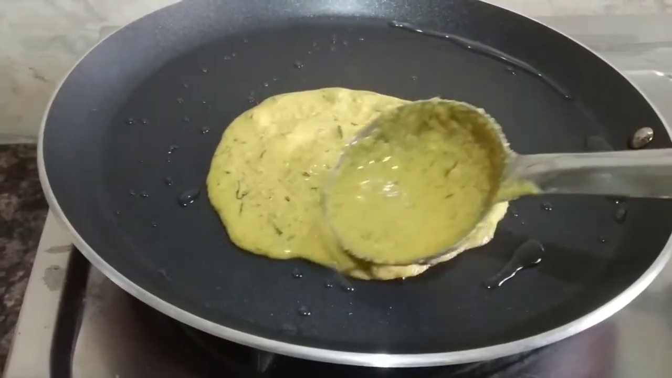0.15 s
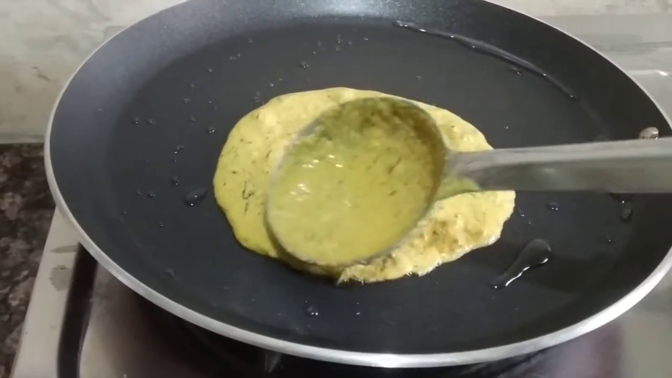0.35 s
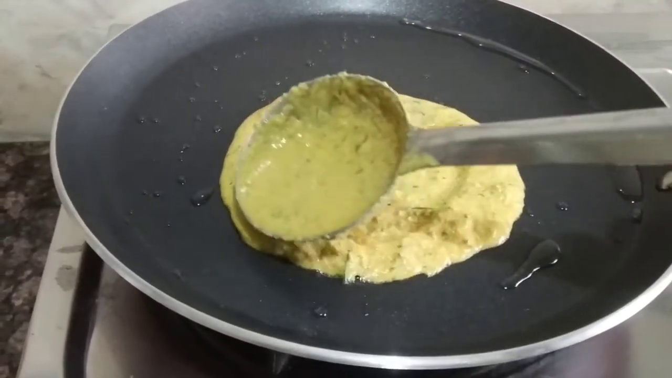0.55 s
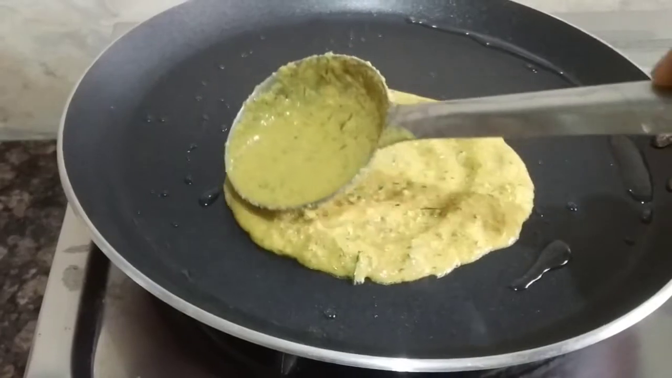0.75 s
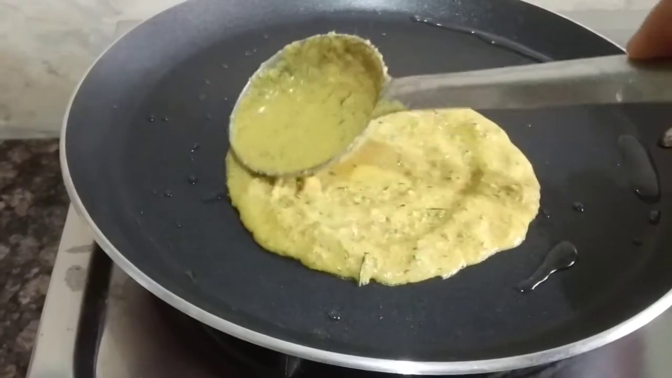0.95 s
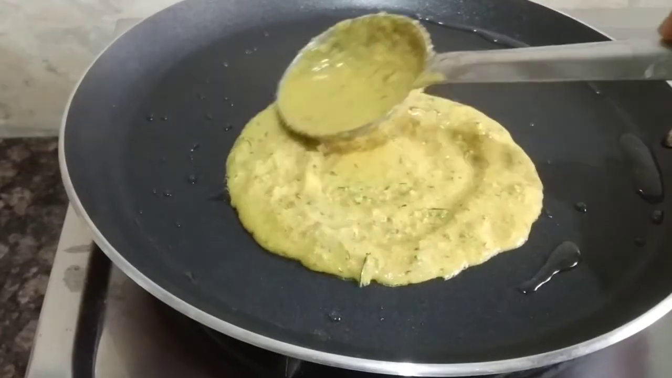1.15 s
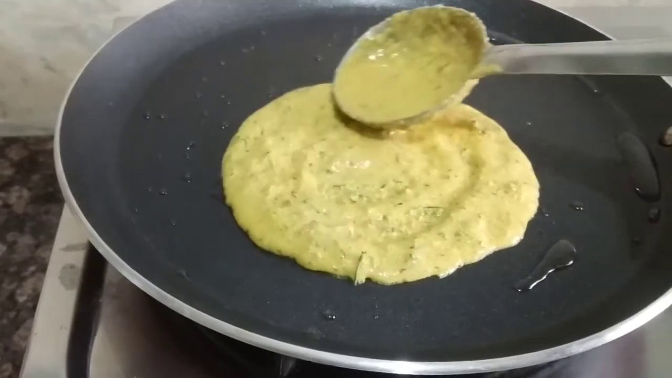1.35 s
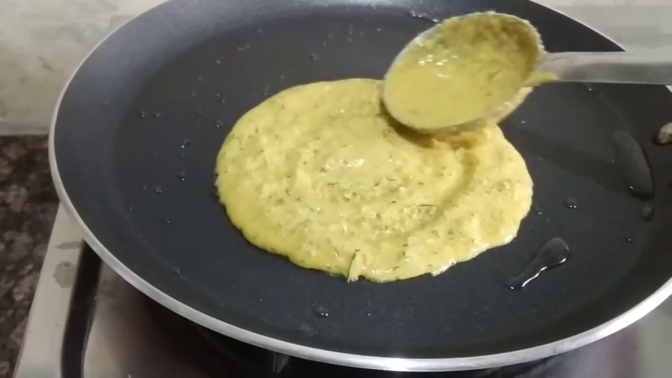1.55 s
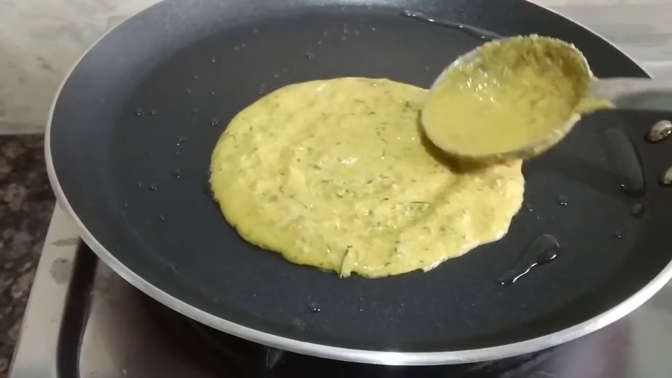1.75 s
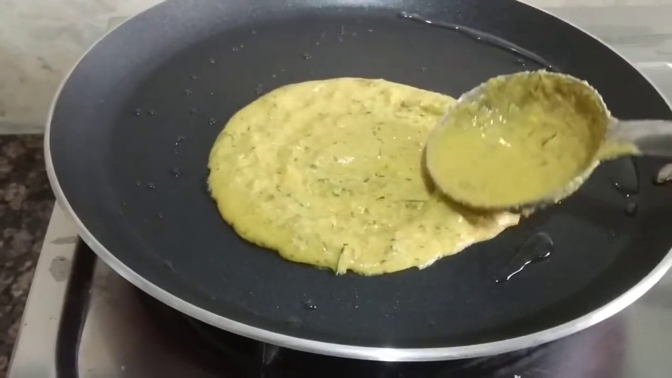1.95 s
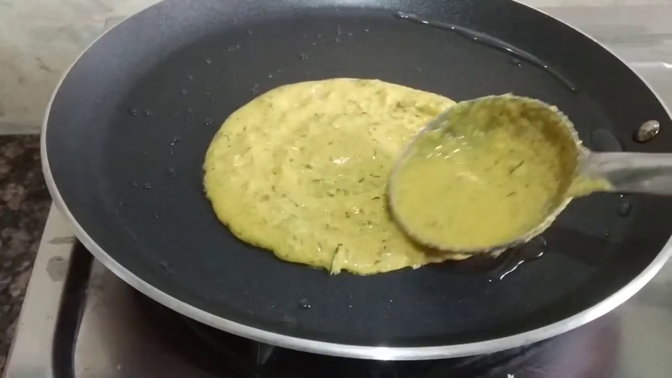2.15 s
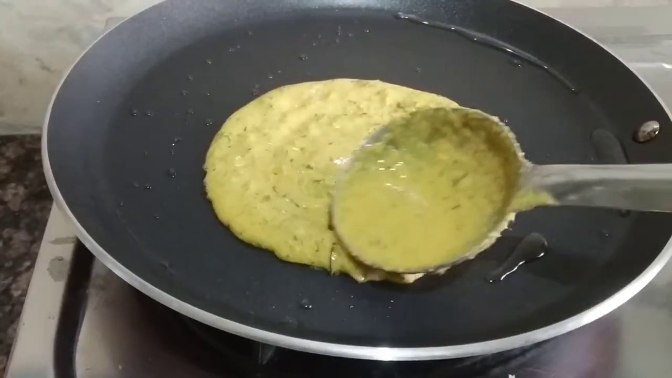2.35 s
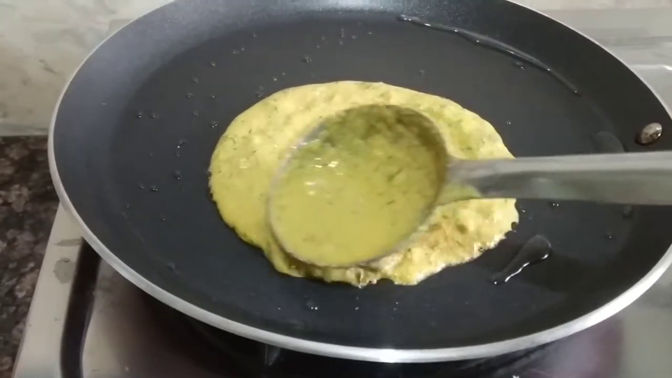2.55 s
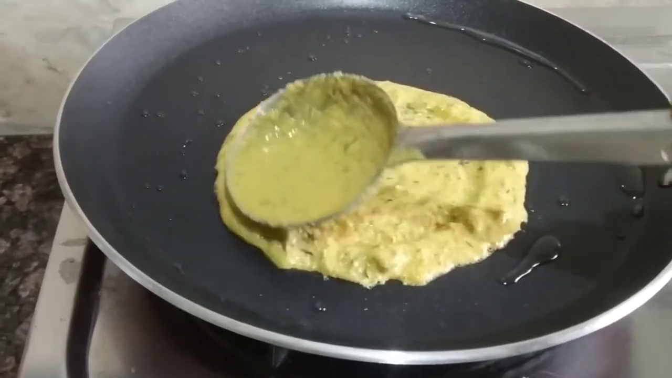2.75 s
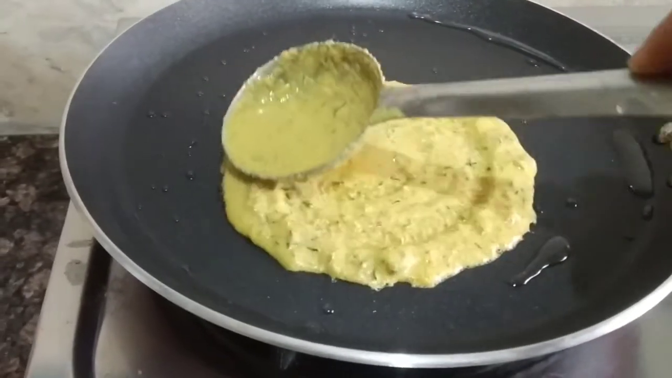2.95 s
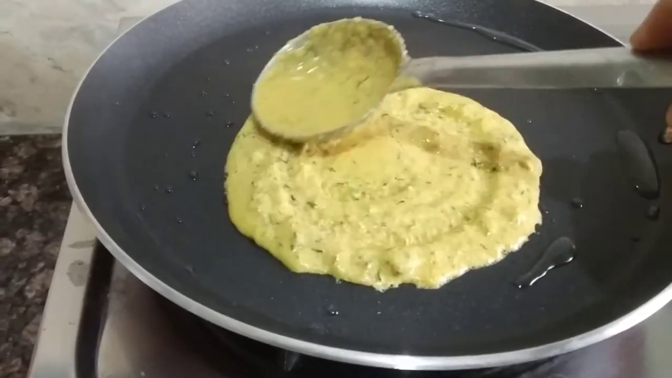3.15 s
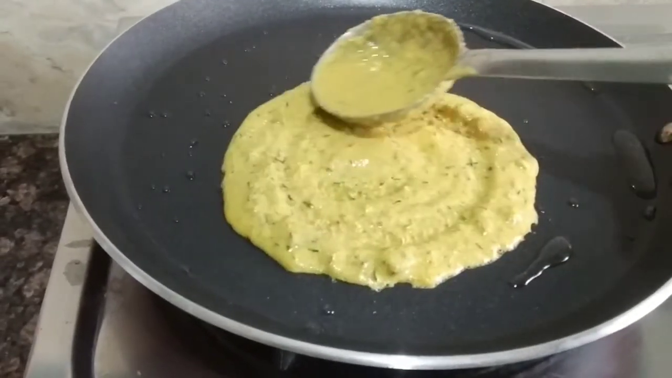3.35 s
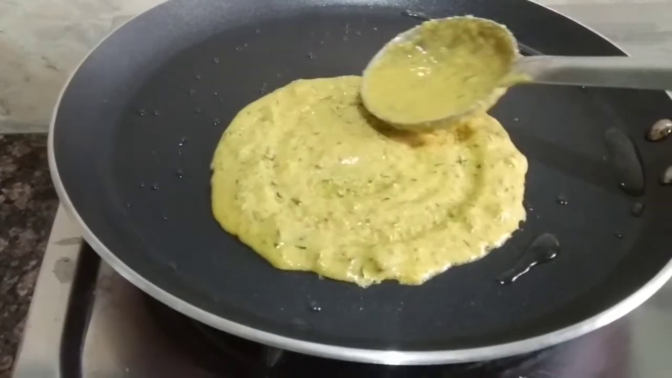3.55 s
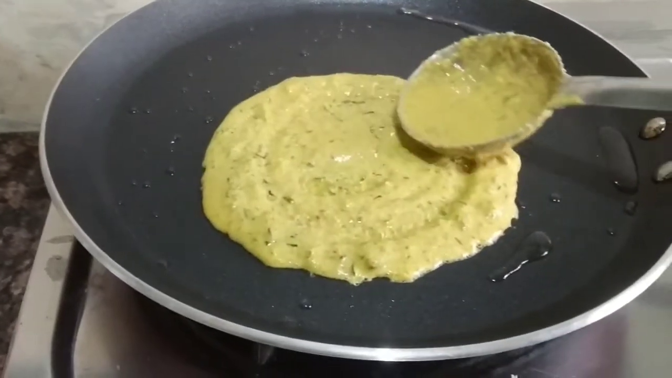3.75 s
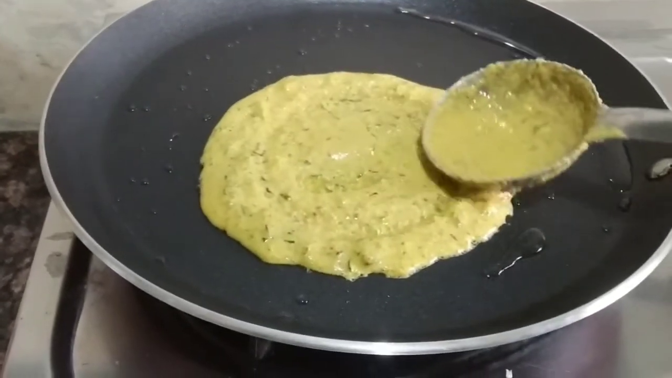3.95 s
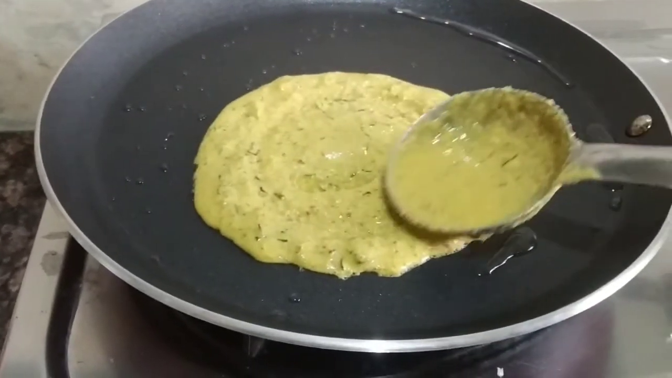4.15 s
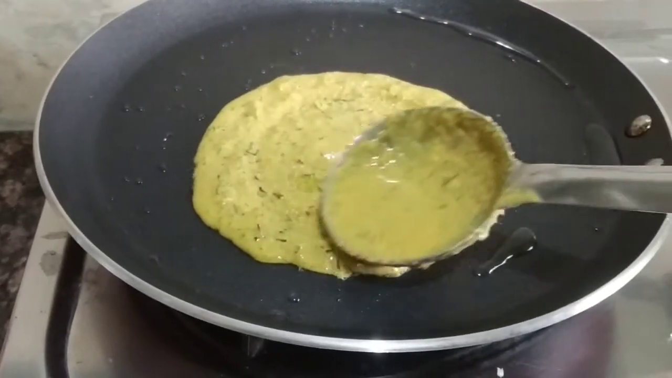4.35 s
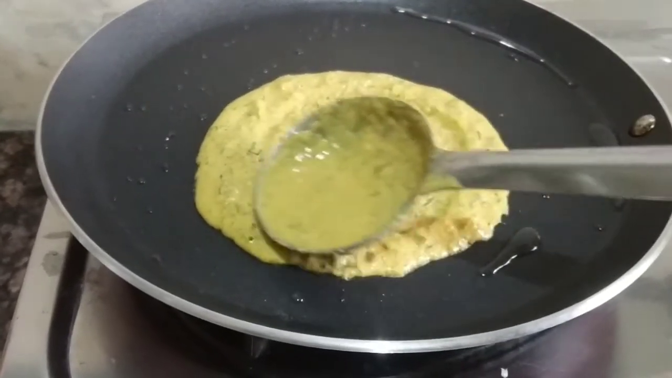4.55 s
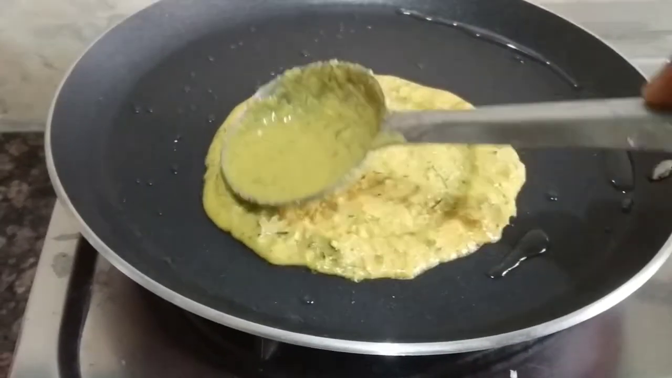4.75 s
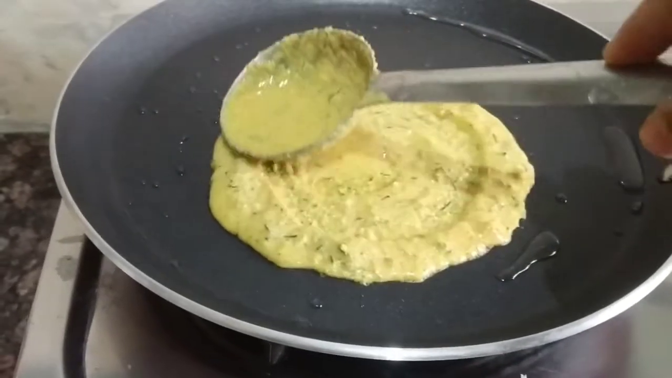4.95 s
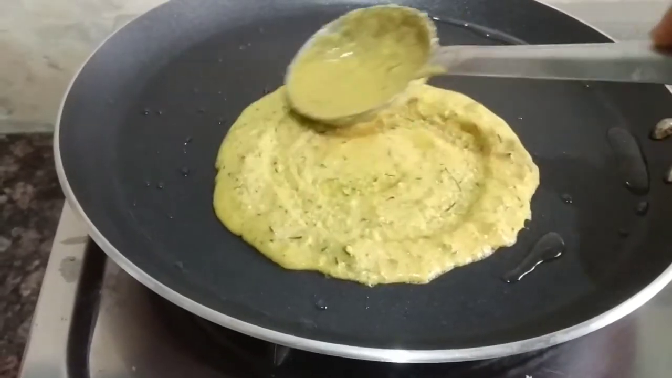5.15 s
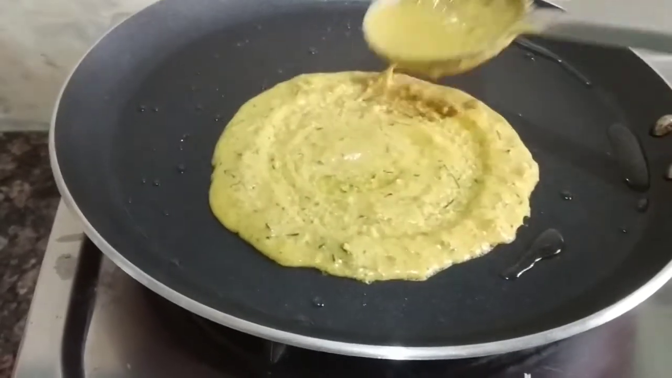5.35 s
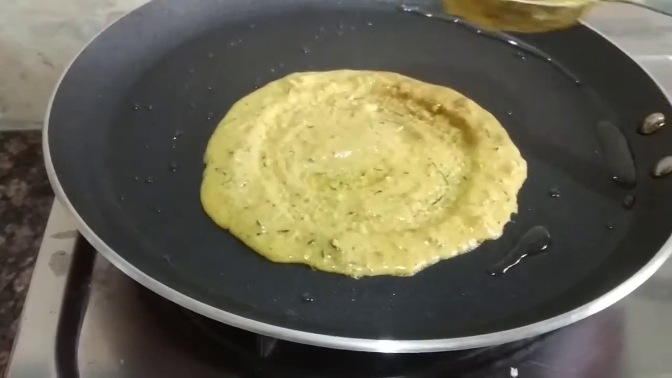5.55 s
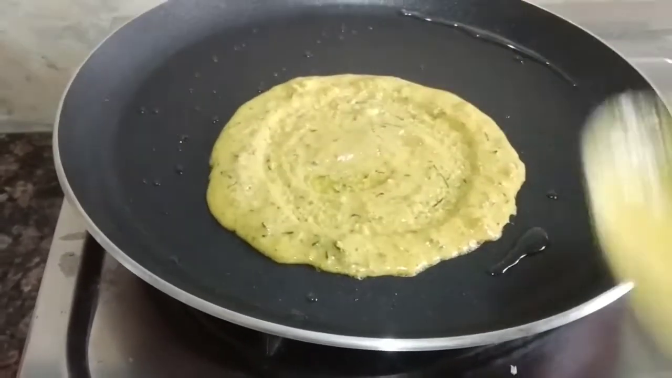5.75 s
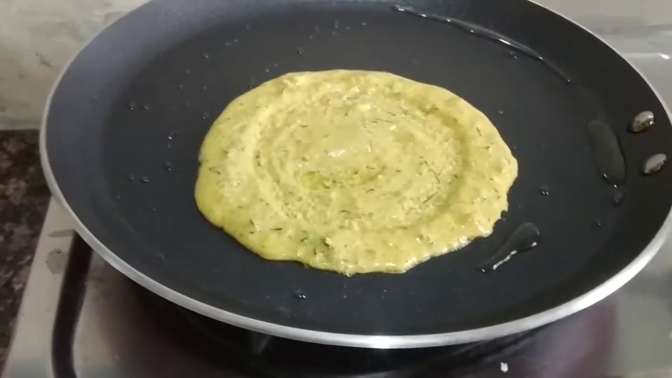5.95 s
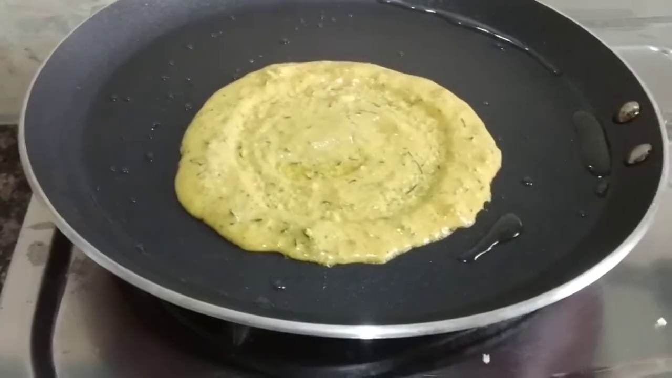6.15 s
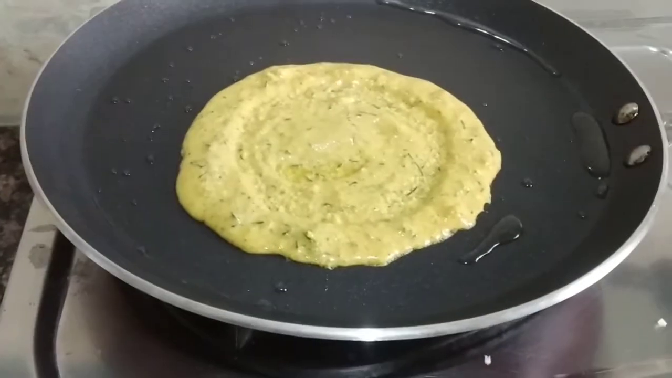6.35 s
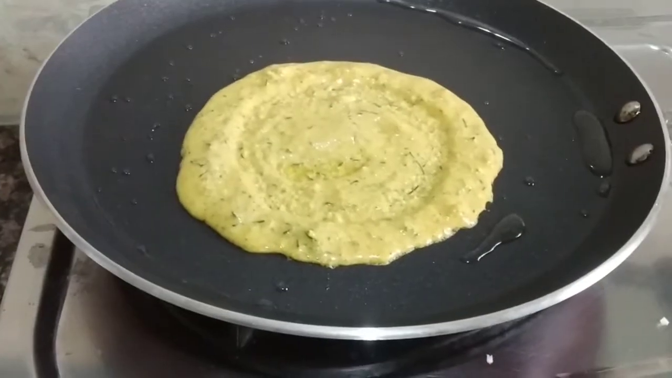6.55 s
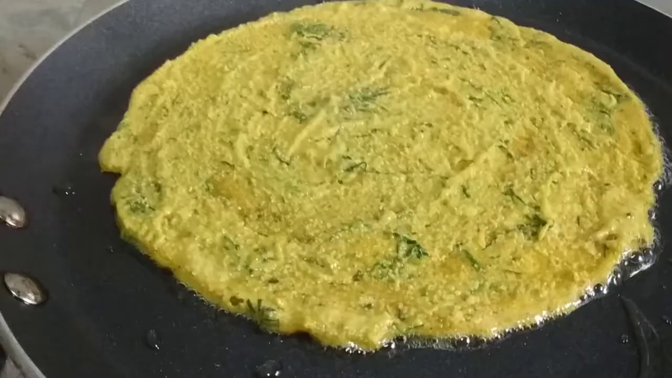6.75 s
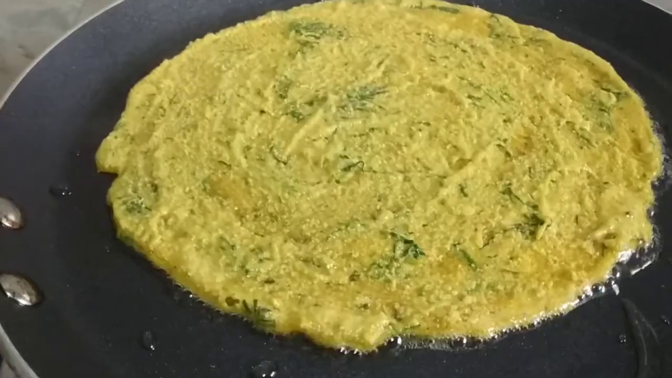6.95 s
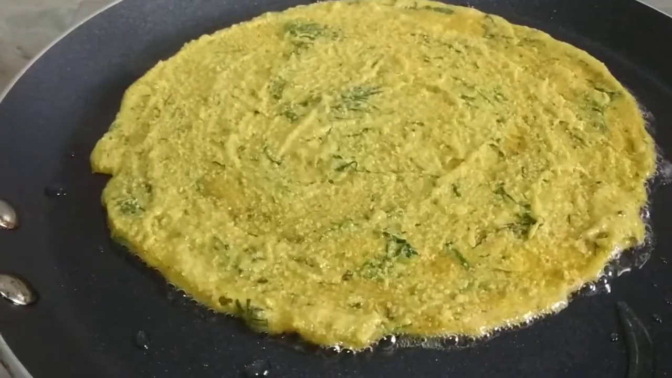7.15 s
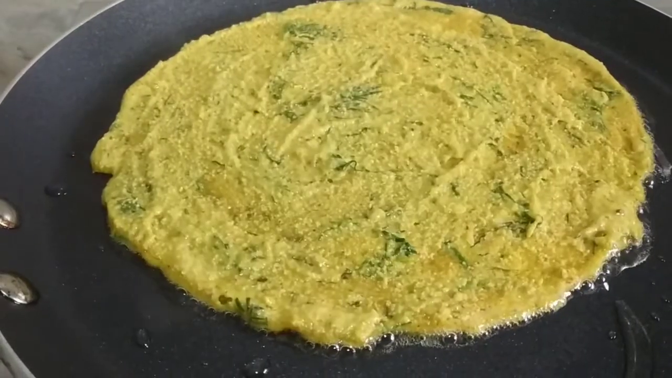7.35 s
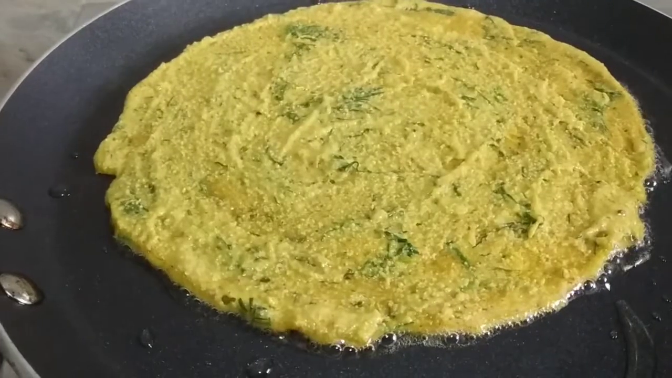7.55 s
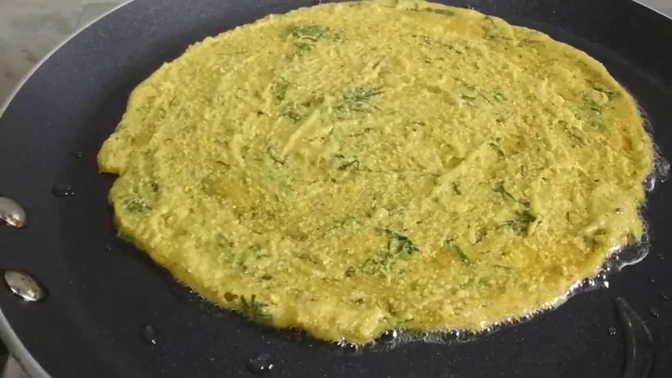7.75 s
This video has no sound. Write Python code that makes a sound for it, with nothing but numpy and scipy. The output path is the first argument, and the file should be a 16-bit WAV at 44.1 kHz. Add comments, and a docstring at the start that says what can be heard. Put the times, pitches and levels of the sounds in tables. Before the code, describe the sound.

Crisp close pan sizzle peppered with snapping oil pops, over low traffic rumble and a departing engine, then a short hard metal clank near six seconds.

```python
"""A small hard-walled kitchen: batter fries in oil on a pan, a dense fizz of bursting steam bubbles with louder pops.
Each bubble is a click that sets a short tone ringing; a pop is a sharper burst within a short swell of noise.
The steel ladle bumps the pan (soft noise round one pitch) and clanks on a metal bowl (contact noise rings steel).
Outside an engine, a stack of sines, speeds up and draws away over a low traffic rumble and hiss of shaped noise.
Two spaced microphones hear it, the pan a little to the right; dying noise makes the echoes."""
import sys
import numpy as np
from scipy import signal
from scipy.fft import rfft, irfft, next_fast_len
from scipy.io import wavfile

SR = 44100
rng = np.random.default_rng(int(sys.argv[2]) if len(sys.argv) > 2 else 0)


def inscribe(sig):
    """Save sig as 16-bit PCM at rate SR to the path in sys.argv[1].

    A 1-D sig is mono; a 2-D sig holds one channel per row.
    Samples are clipped to [-1, 1] before scaling.
    """
    pcm = np.round(np.clip(np.atleast_2d(sig).T, -1, 1) * 32767)
    wavfile.write(sys.argv[1], SR, pcm.astype(np.int16))


def magnitude_from_level(level_db):
    """Linear magnitude for a level in decibels (20 dB per decade)."""
    exponent = np.asarray(level_db, float) / 20
    return 10 ** exponent


N = 344421   # length in samples

# vigour of the frying, rising as the ladle pushes batter onto fresh oil: [t/s, relative level/dB]
FRYING_VIGOUR = [(0, -35.5), (.12, -38.5), (.66, -40.5), (.74, -38), (.9, -43), (1.22, -43.5), (1.5, -42),
                 (1.7, -43.5), (2.01, -39), (2.41, -40), (2.79, -44), (3.48, -46.5), (3.76, -40),
                 (4.0, -44.5), (4.27, -42), (4.36, -47.5), (5.58, -51), (6.86, -49.5), (7.46, -52),
                 (7.81, -48.5)]


def rms_one(x):
    """Scale to unit power."""
    return x / np.sqrt(np.mean(x ** 2) + 1e-20)


def in_time(rows):
    """Columns of a table as values at every sample."""
    s, *columns = np.transpose(rows)
    return [np.interp(np.arange(N) / SR, s, column) for column in columns]


def at_hz(points, hz):
    """Read a spectrum table on a log-frequency axis."""
    table_hz, values = np.transpose(points)
    return np.interp(np.log(np.maximum(hz, 1)), np.log(table_hz), values)


def drift(rate_hz):
    """Slow chance wandering with spread 1, made at every 40th sample and joined by straight lines."""
    r = np.exp(-2 * np.pi * rate_hz * 40 / SR)
    noise = rng.standard_normal(N // 40 + 2002)
    slow = signal.lfilter([1], [1, -2 * r, r * r], noise)[2000:]   # skip the filter's start-up
    return np.interp(np.arange(N) / 40, np.arange(len(slow)), rms_one(slow))


def low_pass(x, order, hz):
    """Keep what lies below a frequency."""
    return signal.sosfilt(signal.butter(order, hz, fs=SR, output="sos"), x)


def high_pass(x, order, hz):
    """Keep what lies above a frequency."""
    return signal.sosfilt(signal.butter(order, hz, "high", fs=SR, output="sos"), x)


def ring(push, hz, t60):
    """A resonator: a unit click sets a sine of height 1 ringing, which falls by 60 dB in t60 seconds."""
    r = magnitude_from_level(-60 / (t60 * SR))
    w = 2 * np.pi * min(hz, SR / 2.2) / SR
    return signal.lfilter([0, np.sin(w)], [1, -2 * r * np.cos(w), r * r], push + 1e-18)


def colour(x, spectrum):
    """Shape a long noise by a spectrum table."""
    size = x.shape[-1]
    hz = np.arange(size // 2 + 1) * SR / size
    return irfft(rfft(x) * magnitude_from_level(at_hz(spectrum, hz)), size)


def clicks(per_s, spread_db):
    """Random clicks of either sign, many small and few large."""
    sizes = magnitude_from_level(spread_db * np.minimum(rng.exponential(1, N), 4)) * rng.choice([-1, 1], N)
    return sizes * (rng.random(N) < per_s / SR)


def fizz():
    """Bubbles burst at random spots round the batter's edge; each spot has its pitch and path to each microphone."""
    # share of large, low-sounding bubbles, often greater when the frying is calmer:
    # [t/s, level against the small ones/dB]
    large_share = [(0, -5.5), (.8, -3), (1.2, -0.5), (1.5, 4), (2.0, 0), (2.5, -2), (3.3, 2), (3.75, 0.5),
                   (4.2, -0.5), (4.9, 4), (7.81, 1.5)]
    # colour of the frying: [f/Hz, relative level per Hz/dB]
    fizz_colour = [(1290, -22), (2200, -18), (2450, -10), (2740, -14.5), (3700, -6.5), (5820, -2.5),
                   (11500, 4.5), (15000, 3), (15900, 2), (16300, -80)]
    bursts_per_s, crackles_per_s, crackle_db = 13000, 600, 7.5
    burst_cycles, spots = 2.5, 24   # cycles a burst takes to fall by 60 dB
    [fizz_db], [large_db] = in_time(FRYING_VIGOUR), in_time(large_share)

    flurry = magnitude_from_level(1.0 * drift(25) + 1.3 * drift(70))   # bursts come in flurries
    bursts = clicks(bursts_per_s * flurry, spread_db=1.5)
    bursts = bursts + magnitude_from_level(crackle_db) * clicks(crackles_per_s * flurry, spread_db=3.5)

    out = np.zeros((2, N))
    spot_of_burst = rng.integers(0, spots, N)
    place = rng.standard_normal((spots, 2))
    for k, hz in enumerate(np.geomspace(4000, 15000, spots)):
        burst = ring(bursts * (spot_of_burst == k), hz, burst_cycles / hz)
        lag = round(SR * (0.00012 + 0.0001 * place[k, 0]))   # the left usually hears it later
        pan_db = -2.5 + 2.0 * place[k, 1]   # left against right
        out += [magnitude_from_level(pan_db / 2) * np.roll(burst, lag), magnitude_from_level(-pan_db / 2) * burst]
    out = rms_one(colour(out, fizz_colour))

    # large bubbles sound low, and their share wanders by chance
    low = signal.sosfiltfilt(signal.butter(2, 6500, fs=SR, output="sos"), out)
    mix = out - low + magnitude_from_level(large_db + 1.5 * drift(3.6)) * low
    return magnitude_from_level(fizz_db + 3.5 + 0.99 * drift(5.8)) * mix


def small_pops():
    """Rows of chance pops, steam bursting at random moments, their strength following the fizz."""
    pops_per_s = 35
    s, size, side, pitch = rng.random((int(pops_per_s * N / SR), 4)).T
    s = s * N / SR
    fizz_db = np.interp(s, *np.transpose(FRYING_VIGOUR))
    peak_db = fizz_db + 10 - 2.5 * np.log(size + .1)   # few strong, many weak
    pan_db = -2 - 4.6 * side
    return list(zip(s, peak_db, pan_db, 7000 * 2 ** pitch))


def pops():
    """A sharp burst of steam rings a few cycles within a swell of noise; from further right, the left hears it later."""
    # loud pops of steam in the oil: [t/s, relative peak level/dB, left against right/dB, ringing f/Hz]
    loud_pops = [(0.2149, -17.5, -2.5, 9000), (.2583, -22, -4, 12600), (.3097, -23, -2.5, 9050),
                 (.596, -23, -2.5, 9130), (1.054, -23, -3.5, 10700), (1.4775, -20, -2, 7140),
                 (2.2223, -24, -4.5, 7740), (2.6249, -25, -4.5, 10700), (3.4441, -26, -3, 7750),
                 (3.703, -23, -2, 7160), (3.757, -21, -3, 10500), (3.829, -24, -3, 11500),
                 (4.0173, -25, -2, 9810), (4.183, -24, -4, 9110), (4.2117, -23, -4.5, 7820),
                 (4.2262, -26, -3, 9000), (4.2632, -24.5, -3, 11000), (4.8878, -25, -5, 14500),
                 (5.252, -26, -3, 8350), (5.5169, -28, -5.5, 10500), (5.884, -27, -5.5, 13500),
                 (0.4599, -13, -2.0, 12000), (0.5496, -18, -2.0, 10000), (0.7143, -17, -4.0, 12500),
                 (0.9268, -17, -2.5, 12500), (0.9862, -24, -4.0, 11700), (1.0735, -17, -4.5, 13400),
                 (1.2386, -18, -2.5, 10500), (1.6955, -18, -3.5, 12500), (1.7828, -18, -3.0, 12500),
                 (2.0123, -14, -3.5, 10000), (2.6948, -18, -2.5, 13900), (3.0091, -18, -4.0, 13100),
                 (3.4979, -23, -2.0, 13400), (3.5538, -20.5, -2.5, 10000), (3.9953, -19.5, -4.0, 12000),
                 (4.6473, -25, -3.5, 13600), (4.6922, -26, -2.5, 9600), (4.9102, -25, -4.5, 10700),
                 (5.1607, -14, -6.0, 11800), (5.6785, -10.5, -1.5, 13000), (5.7214, -21, -5.5, 11200),
                 (6.4622, -17.5, -6.5, 12400), (6.8857, -17, -4, 13000), (7.1167, -14, -4.5, 12500)]
    rows = loud_pops + small_pops()
    out = np.zeros((2, N + 2000))
    t = (np.arange(600) - 60) / SR
    swell = np.where(t < 0, np.exp(t / .0008), np.exp(-t / .0012))   # rises just before the burst, dies after it
    noises = rng.standard_normal((len(rows), 2, 600))
    for (s, peak_db, pan_db, hz), noise in zip(rows, noises):
        kick = (t == 0) + magnitude_from_level(-21) * noise * swell
        burst = high_pass(kick + .6 * ring(kick, hz, 3.5 / hz), 2, 6500)
        burst = burst / np.abs(burst).max(axis=1, keepdims=True)
        left_lag_s = max(-pan_db, 0) * .00004
        for side, (lag_s, gain_db) in enumerate([(left_lag_s, pan_db / 2), (0, -pan_db / 2)]):
            at = round((s + lag_s) * SR)
            out[side, at:at + 600] += magnitude_from_level(peak_db + 4 + gain_db) * burst[side]
    return out[:, :N]


def clanks():
    """Ladle on bowl: a few milliseconds of rattling contact set the natural tones of the steel ringing."""
    # ladle on bowl: [t/s, relative peak level/dB, left against right/dB]
    hits = [(6.214, -5.5, 1), (6.2335, -19, 0), (6.2393, -10.5, -2), (6.2435, -14, -2), (6.262, -19, -1)]
    # tones of ladle and bowl: [f/Hz, relative level/dB, time to fall by 60 dB/s]
    steel_tones = [(171, -38, 0.14), (244, -38, 0.077), (366, -30.5, 0.065), (424, -33.5, 0.1),
                   (572, -24.5, 0.031), (614, -21, 0.045), (705, -16.5, 0.026), (770, -14.5, 0.014),
                   (881, -22.5, 0.071), (1246, -9, 0.0061), (1440, -6, 0.0089), (1600, -5, 0.0041),
                   (2270, -19, 0.038), (2430, -14.5, 0.017), (2880, -11, 0.007), (3590, -9, 0.018),
                   (4140, -10.5, 0.019), (4950, -11, .012), (5145, -10, .03), (5245, -8, 0.03),
                   (5400, -4, 0.012), (5670, -7, 0.02), (5779, -8, 0.06), (5950, -5, 0.018),
                   (6940, -17.5, 0.032), (7560, -3, 0.013), (8020, -0.5, 0.016), (8670, -3, 0.0086),
                   (9640, -17, 0.037), (10500, -8.5, 0.019), (11380, -12, 0.066), (12800, -25, 0.013),
                   (13000, -6, 0.0056), (14300, -13, 0.016)]
    # how the steel radiates: [f/Hz, left against right/dB]
    steel_pan = [(250, 1), (1000, 1), (2300, 4), (4000, -1), (5800, -6), (12000, -2)]
    chatter_db, chatter_s = -34.5, 0.028   # loose metal buzzing on after each clank, and its dying time
    out, span = np.zeros((2, N)), SR // 2
    start, t = round(hits[0][0] * SR), np.arange(300) / SR
    left_right = np.array([[1], [-1]])

    contact = np.zeros((2, span))
    for s, peak_db, pan_db in hits:
        at = round(s * SR) - start
        rattle = rng.standard_normal((2, 300)) * (t / .0003) * np.exp(-t / .0003)
        rattle = rattle + 2 * (np.arange(300) == [[14], [26]])   # one click, later on the right
        contact[:, at:at + 300] += magnitude_from_level(peak_db - 15.5 + pan_db / 2 * left_right) * rattle
        dying = np.exp(-np.arange(span - at) / SR / chatter_s)
        contact[:, at:] += magnitude_from_level(peak_db + chatter_db) * dying * rng.standard_normal((2, span - at))

    # the push itself moves the low tones, alike on both sides
    shove = signal.lfilter([.3], [1, -.7], np.abs(contact).mean(axis=0))
    sound = magnitude_from_level(-19) * contact   # bare contact noise
    for k, (hz, level_db, t60) in enumerate(steel_tones):
        gain = magnitude_from_level(level_db + at_hz(steel_pan, hz) / 2 * left_right)
        push = shove if hz < 1000 else contact
        sound = sound + (-1) ** k * gain * ring(push, hz, t60)   # neighbours swing in opposite sense
    out[:, start:start + span] += sound
    return out


def soft_noises():
    """Dull rubs of the ladle, and the low body of the big pop at 5.68 s: noise ringing round one pitch each."""
    # soft noises: [t/s, relative level/dB, f/Hz, length/s]
    noises = [(1.705, -57, 890, 0.06), (1.77, -61, 1000, .04), (1.7, -58, 330, 0.09),
              (2.685, -58, 900, 0.027), (4.223, -60.5, 1010, 0.07), (5.677, -52, 1350, 0.015),
              (5.68, -57, 520, .025), (5.73, -58, 1250, .025), (5.678, -55, 2500, .018),
              (5.735, -55, 310, 0.11), (5.7, -54, 150, .15), (5.7, -59, 700, .14)]
    ring_cycles = 21
    out = np.zeros((2, N))
    for s, level_db, hz, length_s in noises:
        size, at = round(length_s * SR), round(s * SR)
        noise = rms_one(ring(rng.standard_normal(size), hz, ring_cycles / hz))
        swell = np.sin(np.pi * np.sqrt(np.arange(size) / size))
        out[:, at:at + size] += magnitude_from_level(level_db) * noise * swell
    return out


def clanks_and_soft_noises():
    """Clanks and soft noises, kept above 135 Hz to remove the resonators' low leakage."""
    return high_pass(clanks() + soft_noises(), 5, 135)


def kitchen(x):
    """Echoes as dying noise, another for each microphone; the treble dies sooner."""
    t60_s, treble_t60_s = .45, .36
    t = np.arange(SR // 2) / SR
    echoes = rng.standard_normal((2, len(t)))
    echoes = echoes + low_pass(echoes[0] - echoes, 2, 500)   # long waves reach both alike
    low = low_pass(echoes, 1, 3000)
    tail = low * magnitude_from_level(-60 * t / t60_s) + (echoes - low) * magnitude_from_level(-60 * t / treble_t60_s)
    tail = tail * np.clip(t / .006, 0, 1)   # echoes build up over 6 ms
    tail = tail / np.sqrt(np.sum(tail ** 2, axis=1, keepdims=True))
    return signal.fftconvolve(x, tail, axes=1)[:, :N]


def engine():
    """Multiples of a rising firing rate sweep up through the resonances of walls and room."""
    # the engine drawing near and away: [t/s, relative level/dB]
    nearness = [(0, -63.5), (1.1, -53), (2.1, -55.5), (2.9, -58), (3.35, -55), (3.8, -62.5), (5.3, -69.5),
                (5.8, -79), (7.81, -100)]
    # what walls and room let through of the engine: [f/Hz, relative level/dB]
    walls = [(26, -24), (33, 1.5), (40, -27), (52, -24), (78, 2.5), (92, -6), (108, -2.5), (125, -12.5),
             (145, -6), (160, -7.5), (176, -4), (195, -12), (215, -6), (260, -28), (340, -7), (450, -54)]
    # strength of each multiple of the firing rate, from the first: [relative level/dB]
    multiples_db = [1, 4, -2.5, 5.5, -2.5, 3, -4.5, -4, 0, -25, -12.5, -5]
    start_hz, gain_hz_per_s, slack_hz_per_s2 = 24.0, 3.4, .07   # firing rate, its rise, the rise slackening
    [level_db] = in_time(nearness)
    t = np.arange(N) / SR
    firing_hz = start_hz + gain_hz_per_s * t - slack_hz_per_s2 * t ** 2
    turns = np.cumsum(firing_hz * (1 + 0.0025 * drift(2.6))) / SR   # slightly unsteady
    hum = np.zeros(N)
    for k, db in enumerate(multiples_db, 1):
        strength = magnitude_from_level(db + at_hz(walls, k * firing_hz) + 3.67 * drift(6.0))
        hum += strength * np.sin(2 * np.pi * (k * turns + rng.random()))
    return magnitude_from_level(level_db) * hum


def wide_noise(spectrum):
    """Stereo noise of rms 1, as alike at the two microphones as the table says at each pitch."""
    # likeness of left and right, below 0 taken as 0: [f/Hz, likeness]
    likeness = [(60, 0.58), (180, 0.6), (550, 0.39), (1650, -0.18), (4970, 0.016), (15000, -0.06)]
    size = next_fast_len(N)
    mid, side = rfft(rng.standard_normal((2, size)))
    alike = np.clip(at_hz(likeness, np.arange(size // 2 + 1) * SR / size), 0, 1)
    pair = np.sqrt(1 + alike) * mid + np.sqrt(1 - alike) * side * [[1], [-1]]
    return rms_one(colour(irfft(pair, size), spectrum)[:, :N])


def rumble_and_hiss():
    """Low traffic rumble and far hiss: two shaped noises, the rumble wavering in level."""
    # the background, which drops abruptly near the end: [t/s, rumble level/dB, relative hiss level/dB]
    around = [(0, -55.5, -64), (2.5, -52.5, -65.5), (4.8, -54, -63.5), (5.7, -51.5, -63),
              (7.38, -52.5, -60), (7.41, -54.5, -68.5), (7.81, -53, -65)]
    # rumble: [f/Hz, relative level per Hz/dB]
    rumble_colour = [(8.8, -4), (15, 15), (36, -2.5), (140, -5.5), (237, -15), (367, -14.5), (500, -21),
                     (650, -24.5), (1100, -120)]
    # hiss: [f/Hz, relative level per Hz/dB]
    hiss_colour = [(150, -65), (250, -9.5), (324, 2.5), (367, -7), (637, -5), (809, -2), (2240, -5),
                   (2460, -3), (3000, -4.5), (3900, -4), (6600, -120)]
    rumble_db, hiss_db = in_time(around)
    rumble = magnitude_from_level(rumble_db + 2.0 * drift(10.0)) * wide_noise(rumble_colour)
    hiss = magnitude_from_level(hiss_db + 6.0) * wide_noise(hiss_colour)
    return rumble + hiss


def scene():
    """Pan close by, ladle further off in the room, street behind the walls."""
    frying = fizz() + pops()
    knocks = clanks_and_soft_noises()
    echoes = kitchen(magnitude_from_level(-14) * frying + magnitude_from_level(-5) * knocks)
    street = engine() + rumble_and_hiss()
    return frying + knocks + echoes + street


def top_cut(x):
    """Nothing passes above the cut-off."""
    return signal.sosfilt(signal.butter(12, 16810, fs=SR, output="sos"), x)


def record(dry):
    """The finished mix, ready to be written."""
    return top_cut(dry)


dry = scene()
out = record(dry)
inscribe(out)
```